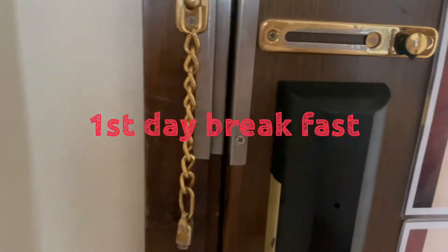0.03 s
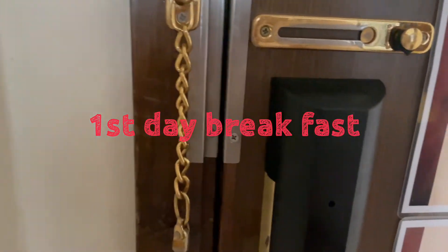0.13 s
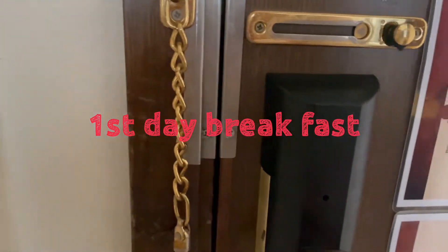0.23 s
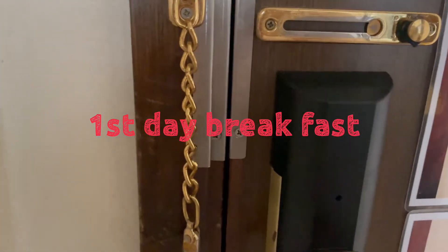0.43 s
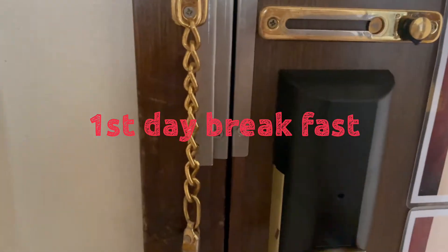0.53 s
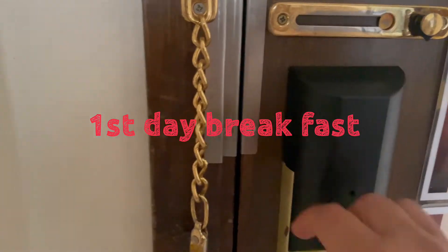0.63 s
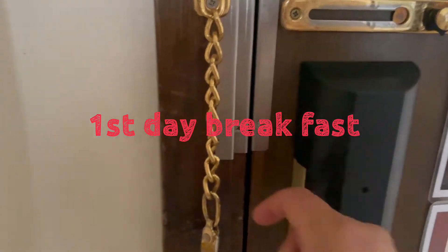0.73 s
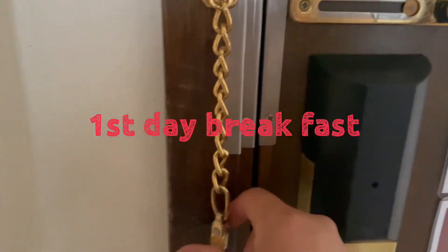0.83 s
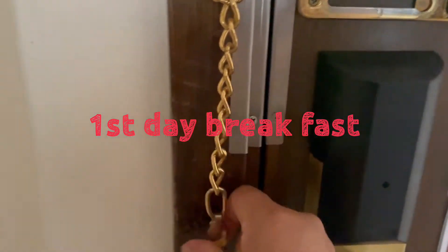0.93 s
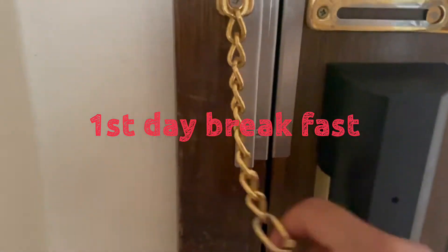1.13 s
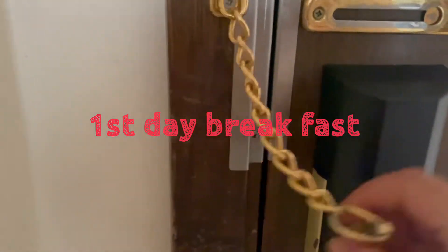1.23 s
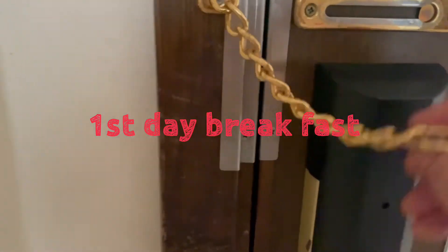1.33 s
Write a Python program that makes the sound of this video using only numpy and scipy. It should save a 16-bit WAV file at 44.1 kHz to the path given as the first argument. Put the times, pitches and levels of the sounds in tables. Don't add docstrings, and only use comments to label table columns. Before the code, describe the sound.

Heavy door closing with a double latch clack and deep thud, followed by small chain clicks

```python
import sys
import numpy as np
from scipy import signal
from scipy.fft import rfft, irfft, next_fast_len
from scipy.io import wavfile
from scipy.ndimage import uniform_filter1d, map_coordinates

SR = 44100
rng = np.random.default_rng(int(sys.argv[2]) if len(sys.argv) > 2 else 0)


def persist_wave(psi):
    counts = np.round(np.clip(psi, -1, 1) * 32767).astype(np.int16)
    wavfile.write(sys.argv[1], SR, np.atleast_2d(counts).T)


def gain_from_db(level_db):
    decades = np.asarray(level_db, float) / 20
    return 10 ** decades


N = 61740


def unit(x):
    return x / np.sqrt(np.mean(x ** 2) + 1e-20)


def along(points, hz):
    f, v = np.transpose(points)
    return np.interp(np.log(hz + 1), np.log(f + 1), v)


def wobble(rate):
    knots = rng.standard_normal(int(N * rate / SR) + 4)
    return map_coordinates(knots, [np.arange(N) * rate / SR])


def filtered(x, response):
    n = x.shape[-1]
    m = next_fast_len(n + 8192)
    return irfft(rfft(x, m) * response(np.fft.rfftfreq(m, 1 / SR)), m)[..., :n]


def coloured_noise(points, size=N, tilt_db=0):
    colour = lambda hz: gain_from_db(along(points, hz) + tilt_db * np.log2((hz + 1) / 3000))
    return unit(filtered(rng.standard_normal((2, size)), colour))


def resonance(hz, width):
    peak = lambda f: 1 / (1 + ((f - hz) / width) ** 2)
    return unit(filtered(rng.standard_normal((2, N)), peak))


def ring(modes, t, scatter_db, attack, flips=.5):
    hz, db, t60 = np.transpose(modes)[..., None]
    shape = (2, len(modes), 1)
    size = gain_from_db(db + scatter_db * rng.standard_normal(shape))
    size = size * np.sign(rng.random(shape) - 1 + flips)
    modes_sum = (size * gain_from_db(-60 * t / t60) * np.sin(2 * np.pi * hz * t)).sum(1)
    return modes_sum * (1 - np.exp(-t / attack))


def add(track, s, sound):
    track[:, round(s * SR):][:, :sound.shape[1]] += sound


def parts(rows, rise_s):
    out, t = np.zeros((2, N + 2 * SR)), np.arange(SR) / SR
    for k, (s, hz, db, t60) in enumerate(rows):
        lag = [[0], [(-1) ** k * np.pi / 2]]
        turn = 2 * np.pi * hz * t + lag
        add(out, s, -gain_from_db(db - 60 * t / t60) * (1 - np.exp(-t / rise_s)) * np.sin(turn))
    return out[:, :N]


def patchy(x):
    z = signal.stft(x, nperseg=512)[2]
    field = rng.standard_normal(z.shape[1:])
    field = uniform_filter1d(uniform_filter1d(field, size=5, axis=0), size=9, axis=1)
    patch_db = 1.5
    return signal.istft(z * gain_from_db(patch_db * unit(field)), nperseg=512)[1][:, :N]


# (frequency [Hz], density [dB per Hz])
RUMBLE = [(15, -21), (30, -8.5), (85, -10), (170, -9.5), (230, -15), (340, -14.5), (480, -15), (950, -49)]
# (frequency [Hz], density [dB per Hz])
GRILLE = [(410, -63), (700, -1), (922, -4.5), (1210, -9), (1980, -13.5), (3430, -23), (5350, -27),
          (11400, -45), (12200, -60), (15900, -99), (22000, -120)]
# (frequency [Hz], width [Hz], level [dB])
DUCT_TONES = [(99, 8.8, -43), (178, 32, -46.5)]


def ventilation():
    tones = sum(gain_from_db(db) * resonance(hz, width) for hz, width, db in DUCT_TONES)
    fan_hz = 227.5 + .7 * wobble(10.94)
    fan_db = -38 + .9 * wobble(20.0)
    fan = gain_from_db(fan_db) * np.sin(2 * np.pi * np.cumsum(fan_hz) / SR)
    rumble = gain_from_db(-40.5 + 0.5 * wobble(7.3)) * coloured_noise(RUMBLE)
    breath = gain_from_db(-45.5 + .8 * wobble(11.26)) * patchy(coloured_noise(GRILLE))
    return rumble + breath + tones + fan


# (time [s], level [dB])
SLEEVE_LEVEL = [(0, -36), (.04, -74.5), (.5, -65.5), (.58, -51.5), (0.629, -55.5), (0.752, -42),
                (.85, -51.5), (1.001, -66), (1.4, -62)]
# (frequency [Hz], density [dB per Hz])
CLOTH_COLOUR = [(880, -6), (1500, -3), (5590, -10), (6050, -10.5), (7530, -10), (10600, -17.5), (12200, 0),
                (15900, -71), (22000, -120)]


def sleeve():
    s, db = np.transpose(SLEEVE_LEVEL)
    grain_db = 1.2 * wobble(40) + 2.2 * wobble(300)
    return gain_from_db(np.interp(np.arange(N) / SR, s, db) + grain_db) * coloured_noise(CLOTH_COLOUR)


# (time [s], slab [dB], panel [dB], edge [dB])
SHOVES = [(.001, -20.5, -19.5, -24), (.024, -14.5, -32.5, -39), (.21, -24, -19, -18.5),
          (0.246, -19.5, -38, -22), (0.251, -12.5, -0.5, -5.5), (0.259, -8, -13.5, -12),
          (0.273, -2.5, -14, -21), (.284, -4.5, -11, -20), (.295, -17, -9.5, -17.5),
          (0.303, -25, -14, -14.5), (0.314, -10, -27, -17.5), (0.344, -48, -52, -14.5),
          (.377, -31, -7.5, -27), (.39, -11, -17.5, -55), (.408, -25, -18.5, -35), (0.424, -20, -19.5, -28),
          (.439, -10, -26, -42), (.465, -10.5, -14, -57), (.483, -13, -16, -37), (0.496, -19, -25.5, -49),
          (0.522, -14.5, -23.5, -47), (0.551, -18, -27, -29), (0.574, -17.5, -25.5, -27),
          (0.608, -29.5, -50, -52), (0.674, -25.5, -33.5, -44), (.72, -35, -38, -31),
          (0.769, -25.5, -39, -40), (0.92, -64, -31, -31.5), (1.02, -30, -32, -34)]
# (frequency [Hz], level [dB], t60 [s])
SLAB_MODES = [(42, -24, 0.15), (70, -2, 0.13), (104, -4.5, 0.13)]
# (frequency [Hz], level [dB], t60 [s])
PANEL_MODES = [(173, 3, 0.096), (236, -2.5, 0.11)]
# (frequency [Hz], level [dB], t60 [s])
JAMB_MODES = [(334, -1.5, 0.095), (372, -5.5, 0.044)]
# (frequency [Hz], level [dB])
EDGE_MODES = [(455, -4.5), (500, -4.5), (590, 2.5), (640, -7), (760, -3.5), (895, -10.5), (1090, -10.5),
              (1190, -15), (1350, -11), (1620, -16.5), (1800, -17.5), (1980, -21)]


def door():
    out, t = np.zeros((2, N + SR)), np.arange(SR // 2) / SR
    scatter_db, edge_t60, detune = 1.8, .11, .025
    hard = 1.4
    for s, slab_db, panel_db, edge_db in SHOVES:
        slab = gain_from_db(slab_db) * ring(SLAB_MODES, t, scatter_db, 0.0028, 0)
        panel = gain_from_db(panel_db - 2.5) * ring(PANEL_MODES, t, scatter_db, 0.0034, 0)
        jamb = gain_from_db(hard * edge_db - 6) * ring(JAMB_MODES, t, 4.1, 0.002, 0)
        shifted = [(hz * (1 + detune * rng.standard_normal()), db, edge_t60) for hz, db in EDGE_MODES]
        edge = gain_from_db(edge_db - 11.5) * ring(shifted, t, 6.5, .0022)
        add(out, s, slab + panel + jamb + edge)
    return out[:, :N]


# (time [s], frequency [Hz], level [dB], t60 [s])
SWAYS = [(.258, 60.7, -6, 0.16), (.262, 42, -23, 0.3), (.3, 92.2, -13, 0.18), (.43, 80, -15, 0.22),
         (.478, 84, -15.5, 0.22), (.52, 97, -26, 0.3), (.6, 35, -25, 1.1), (0.01955, 84, -28, 0.55),
         (1.0, 100.7, -31.5, 0.43)]


def hinges():
    return parts(SWAYS, 0.0071)


# (time [s], peak [dB], brightness [dB per octave], t60 [s])
CLACKS = [(0.201, -55, 11, 0.09), (0.209, -22, 5, 0.031), (0.2093, -10.5, 3, 0.032),
          (0.2151, -6.5, -1.5, 0.03), (.224, -19, -3, 0.078), (0.2388, -5.5, 4.5, 0.023),
          (0.236, -16, 3.5, 0.034), (0.2428, -6.5, -4.5, 0.038), (0.248, -22, 2.5, 0.062),
          (.286, -31.5, -2.5, 0.18)]
# (frequency [Hz], density [dB per Hz])
BOLT_COLOUR = [(180, -37), (300, -9.5), (470, -1.5), (874, -15), (1200, -9.5), (1930, -5), (4060, -12.5),
               (5620, -17), (8410, -20), (12200, -36), (15900, -70), (22000, -120)]


def latch():
    out, t = np.zeros((2, N + SR)), np.arange(8192) / SR
    for s, db, tilt_db, t60 in CLACKS:
        envelope = gain_from_db(db + 1.0 - 60 * t / t60) * (1 - np.exp(-t / 0.0018))
        add(out, s, envelope * coloured_noise(BOLT_COLOUR, len(t), tilt_db))
    return out[:, :N]


# (time [s], frequency [Hz], level [dB], t60 [s])
TRIM_PARTS = [(.209, 457.5, -15.5, 0.37), (.213, 1530, -21, 0.1), (.237, 2010, -20.5, 0.13),
              (.241, 1360, -18, 0.085), (.241, 1650, -28, 0.079), (.245, 779, -15, 0.083),
              (.243, 641, -11.5, 0.11), (.249, 364, -6.5, .12), (.283, 399.6, -13, 0.088),
              (.252, 265, -20.5, 0.049), (.29, 1900, -20, 0.068), (.3, 336, -18.5, 0.33),
              (.317, 1130, -26, 0.14), (.378, 410, -26, 0.28), (.43, 460, -29.5, 0.19),
              (.44, 400, -34, 0.22), (0.83, 820, -42.5, 0.089), (.932, 760, -37, 0.096),
              (.317, 1700, -32, 0.087)]


def trim():
    return parts(TRIM_PARTS, 0.0022)


# (time [s], frequency [Hz], level [dB], t60 [s])
BAR_MODES = [(.2095, 6200, -12, 0.022), (.2095, 9930, -17.5, 0.022), (.2388, 6690, -14.5, 0.026),
             (.2388, 8600, -18.5, 0.031), (.2415, 4190, -14, 0.025)]


def latch_bar():
    return parts(BAR_MODES, 0.00089)


SQUEAK_TONES = [-11, 1.5, -7.5, -1, -40, -9.5, -18, -13.5]


def seal():
    start_s, rise_s, hold_s, t60 = .281, 0.005, 0.016, 0.056
    slip_hz, sag, level_db = 295.6, -0.33, -19.5
    t = np.clip(np.arange(N) / SR - start_s, 0, None)
    turn = 2 * np.pi * slip_hz * (t + sag * t ** 2 / 2)
    views = [[0], [np.pi / 2]]
    tone = sum(gain_from_db(db) * np.sin((k + 1) * turn + k ** 2 + views) for k, db in enumerate(SQUEAK_TONES))
    fall = gain_from_db(level_db - 60 * np.clip(t - hold_s, 0, None) / t60)
    return np.clip(t / rise_s, 0, 1) * fall * tone


# (time [s], peak [dB], main ring [Hz], t60 [s], ring level [dB])
TICKS = [(0.329, -32, 6750, 0.035, -17), (0.345, -41, 4940, 0.02, -7), (.4208, -68, 2303, 0.012, -16),
         (0.4504, -44.5, 3450, 0.028, 5.5), (0.4772, -42.5, 5140, 0.086, -5), (0.56, -46.5, 2190, 0.088, 1),
         (0.5703, -34.5, 1890, 0.072, -7.5), (0.594, -35.5, 4150, 0.016, -7),
         (0.651, -38, 3000, 0.032, -22), (0.8215, -40, 6040, 0.039, -22), (.885, -42, 3740, 0.0155, -5),
         (0.9237, -33.5, 5100, 0.019, -2), (0.9876, -33, 6000, 0.026, -13),
         (0.988, -22, 12300, 0.0049, 5.5), (0.995, -42, 2600, 0.049, -0.5),
         (1.0566, -36, 6550, 0.0095, -14), (1.072, -35.5, 5030, 0.012, -21),
         (1.102, -32.5, 2090, 0.023, -9.5), (1.117, -39, 6000, 0.012, -15),
         (1.1631, -45.5, 6700, 0.017, 2.5), (1.201, -34, 6650, 0.027, -4.5), (1.287, -43, 6840, 0.029, -19),
         (1.3796, -41, 2860, 0.01, -2)]
# (frequency [Hz], density [dB per Hz])
SNAP_COLOUR = [(530, -30), (900, 6), (3680, -5.5), (8890, -8.5), (10100, -23.5), (11300, -7.5),
               (12200, -16), (15900, -48), (22000, -120)]


def chain():
    out, t = np.zeros((2, N + SR)), np.arange(4096) / SR
    brighter_db, ring_width = 2, .09
    for s, db, hz, t60, ring_db in TICKS:
        snap = coloured_noise(SNAP_COLOUR, len(t), brighter_db * np.log2(hz / 4000))
        peak = lambda f: 1 / (1 + ((f / hz - 1) / ring_width) ** 2)
        brass = unit(filtered(rng.standard_normal(snap.shape), peak))
        envelope = gain_from_db(db - 60 * t / t60) * (1 - np.exp(-t / 0.00052))
        add(out, s, envelope * (snap + gain_from_db(ring_db) * brass))
    return out[:, :N]


# (time [s], level [dB], t60 [s], tilt [dB per octave])
STRIKES = [(.9885, -34.5, .03, -5), (.935, -45, .03, -1), (1.1025, -50, 0.02, -2), (1.202, -42, 0.023, 0),
           (1.4, -39, 0.015, -4)]
# (frequency [Hz], level [dB])
LINK_MODES = [(1240, -11), (1510, -9), (2200, -10), (2520, -5), (3160, -8), (3560, 0), (4050, -7),
              (4590, -5), (5200, -7), (5950, -8), (6600, -5), (8020, -11), (8660, -9)]


def links():
    rows = []
    for s, db, t60, tilt_db in STRIKES:
        for hz, mode_db in LINK_MODES:
            rows.append((s, hz, db + mode_db + tilt_db * np.log2(hz / 3500), t60))
    return parts(rows, 0.00062)


# (frequency [Hz], t60 [s])
ROOM_T60 = [(200, 0.71), (1000, 0.22), (4000, 0.36), (10000, 0.11)]


def room(x):
    hz, t, z = signal.stft(rng.standard_normal((2, SR // 2)), SR, nperseg=256)
    fall = gain_from_db(-60 * t / along(ROOM_T60, hz)[:, None])
    tail = signal.istft(z * fall, SR, nperseg=256)[1]
    late = np.pad(x, ((0, 0), (300, 0)))
    return signal.fftconvolve(late, tail / np.linalg.norm(tail[0]), axes=1)[:, :N]


# (frequency [Hz], correlation [-1 to 1])
LIKENESS = [(100, .97), (180, 0.92), (300, 1), (430, -0.42), (520, -0.91), (750, -0.3), (1000, -0.069),
            (8000, 0.043), (9300, -0.37)]
# (frequency [Hz], level [dB])
LEFT_OVER_RIGHT = [(60, -1.5), (170, 4.5), (350, 5), (550, 3), (2000, 1.5), (5000, 8), (9000, 4),
                   (12000, 0.5)]


def ports(pair):
    turn = lambda hz: np.arccos(np.clip(along(LIKENESS, hz), -1, 1)) / 2
    mid, side = filtered(pair, lambda hz: np.array([np.cos(turn(hz)), np.sin(turn(hz))]))
    balance = lambda hz: gain_from_db(along(LEFT_OVER_RIGHT, hz) * [[.5], [-.5]])
    return filtered(np.array([mid + side, mid - side]), balance)


def diffuse(pair):
    left, right = ports(pair)
    opposed_hz, opposed_db = 9000, -20
    mid = filtered(left + right, lambda hz: gain_from_db(opposed_db * np.clip((hz - opposed_hz) / 300, 0, 1)))
    return np.array([mid + left - right, mid - left + right]) / 2


def scene():
    wood = door() + hinges()
    metal = latch() + trim() + latch_bar() + chain() + links()
    hits = wood + metal + seal()
    room_db = -18
    return ports(hits + sleeve()) + diffuse(gain_from_db(room_db) * room(hits) + ventilation())


def band_limit(x):
    return signal.sosfilt(signal.butter(12, 12350, fs=SR, output="sos"), x)


# (centre [Hz], width [Hz], depth [0-1])
HOUSING_DIPS = [(5560, 68, 1), (7480, 233, 0.8)]


def record(dry):
    ceiling, knee = 1.25, 5.3
    x = dry / (1 + np.abs(dry / ceiling) ** knee) ** (1 / knee)

    def microphone(hz):
        dips = np.prod([1 - depth / (1 + ((hz - c) / w) ** 2) for c, w, depth in HOUSING_DIPS], axis=0)
        roll = gain_from_db(-11.5 * np.clip(hz - 11530, 0, None) / 1000)
        return dips * roll * (hz < 12350) * (hz > 18)

    return band_limit(np.clip(filtered(x, microphone), -1, 1))


dry = scene()
out = record(dry)
persist_wave(out)
```